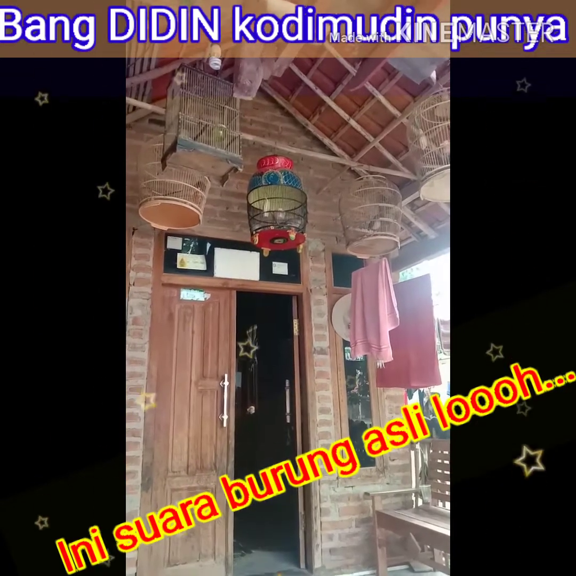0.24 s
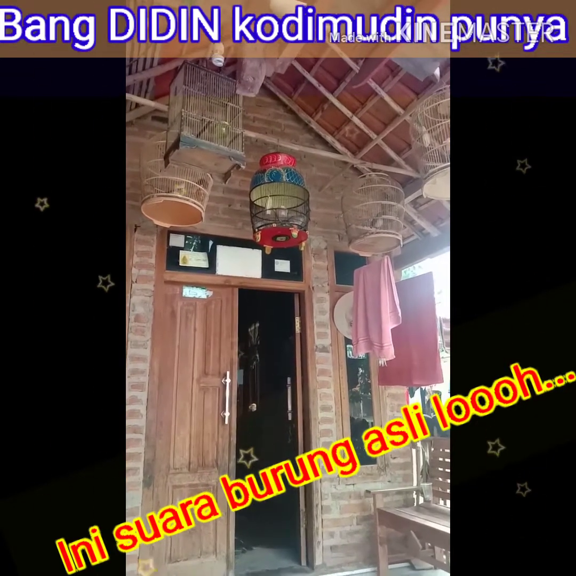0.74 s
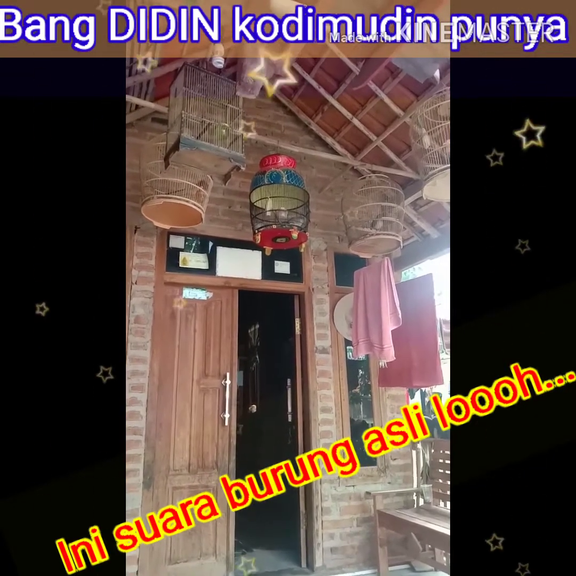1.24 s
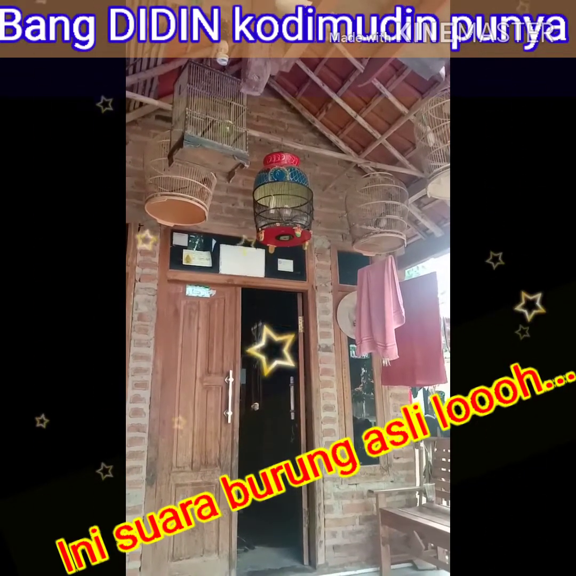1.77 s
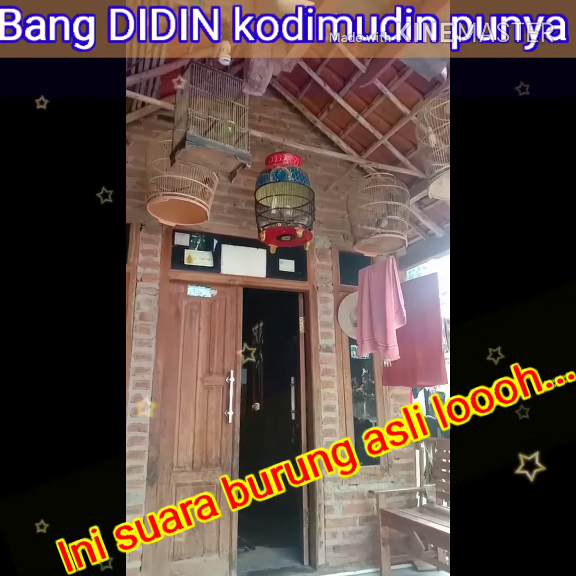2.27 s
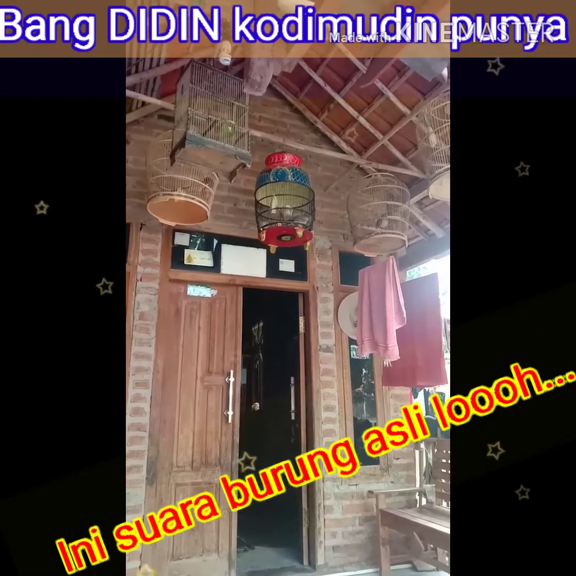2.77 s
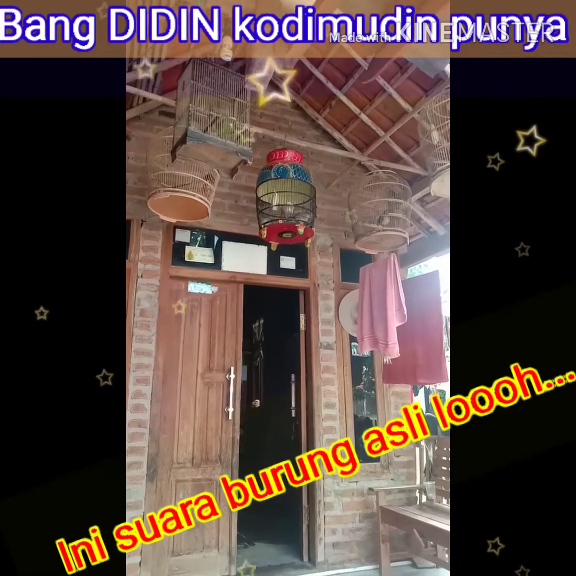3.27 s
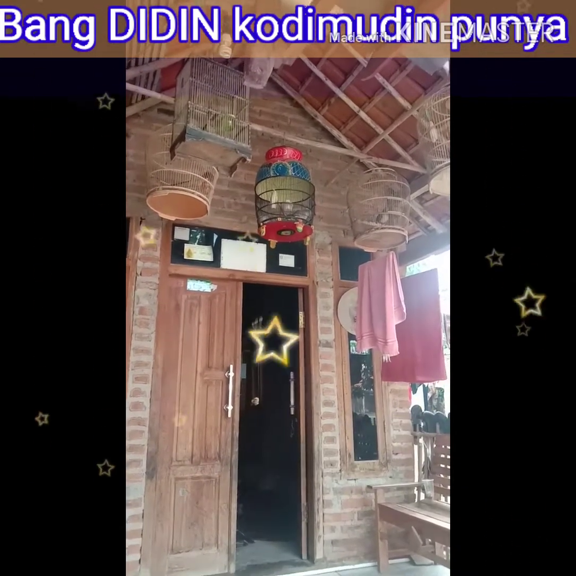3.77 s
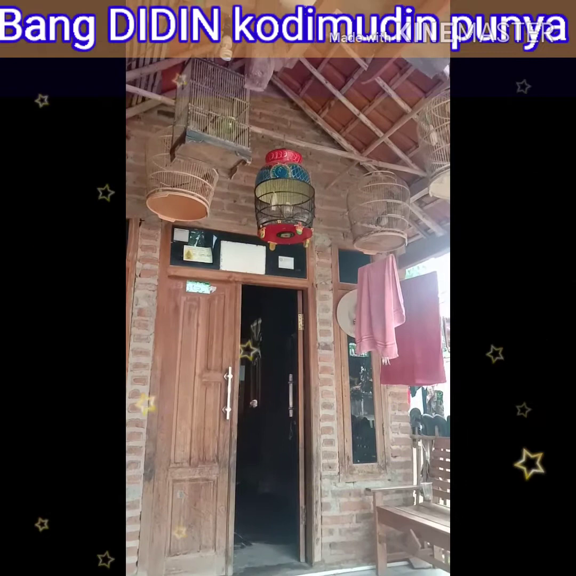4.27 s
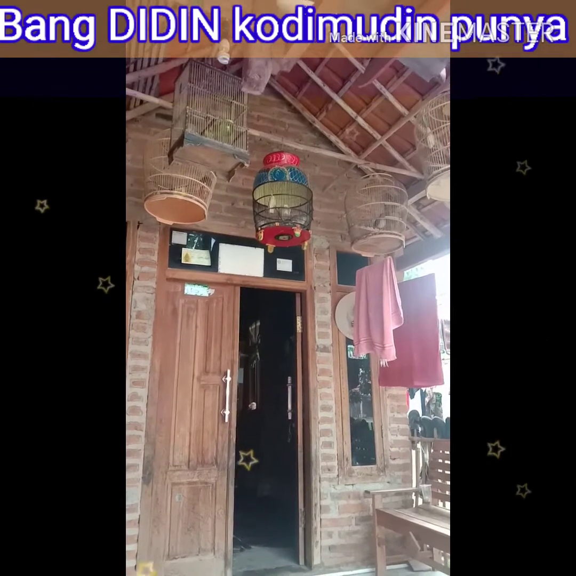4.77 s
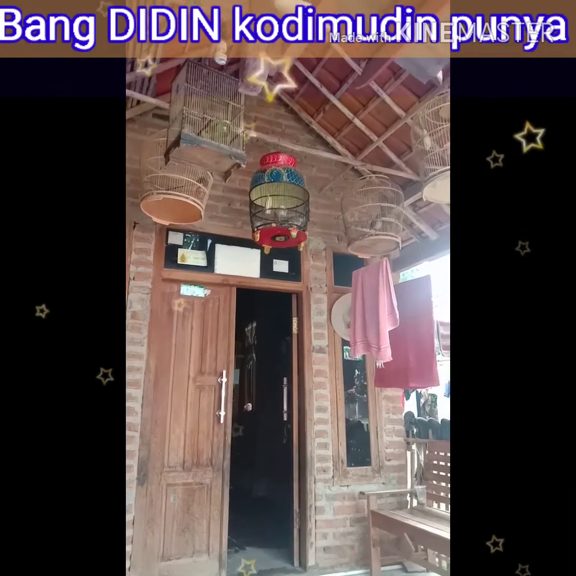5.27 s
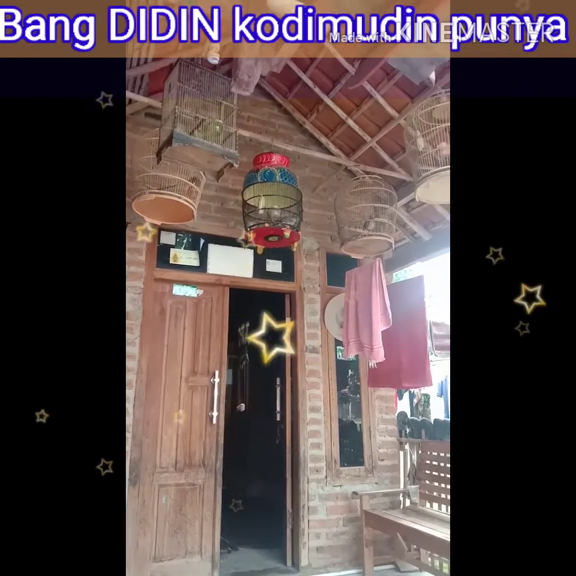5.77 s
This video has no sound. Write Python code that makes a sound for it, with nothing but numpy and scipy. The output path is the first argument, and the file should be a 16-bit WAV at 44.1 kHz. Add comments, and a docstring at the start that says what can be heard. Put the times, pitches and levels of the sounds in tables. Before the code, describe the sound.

A caged dove close by sings a quick six-note mellow coo three times on a brick porch, another dove answering softly, over low rumble.

```python
"""Brick porch: a caged dove coos a motif of six quick, almost pure notes, blurred by the near walls.
The motif comes three times, the first already under way. Each note is a sine swooping up and sagging.
A second dove answers softely from further off with a run of upward-breaking notes and echoes.
Small far birds chirp and call (gliding sines or noise bands); faint dry swishes and a soft knock pass.
Under it all: low rumble, faint hum, distant noise, open-air hiss and a speckle of faint random pips."""
import sys
import numpy as np
from scipy import signal
from scipy.fft import rfft, irfft, next_fast_len
from scipy.io import wavfile

SR = 44100
rng = np.random.default_rng(int(sys.argv[2]) if len(sys.argv) > 2 else 0)


def int16_out(signal):
    """Quantize to a 16-bit WAV file."""
    q = np.round(np.clip(np.atleast_2d(signal).T, -1, 1) * 32767)
    wavfile.write(sys.argv[1], SR, q.astype(np.int16))


N = 265909
TIME_S = np.arange(N) / SR

# Near dove, notes of one motif: start_s in phrase, length_s, swoop_s (time constant),
# top_hz, end_hz (both before sag), level_db
MOTIF = [(0, 0.11, 0.005, 1254, 1227, -13), (0.12, 0.027, 0.0016, 1234, 1130, -12.5),
         (0.1593, 0.033, .0029, 1218, 1132, -13.5), (0.219, .036, .0047, 1208, 1040, -13),
         (0.3078, 0.035, 0.0052, 1234, 1151, -12.5), (0.407, 0.14, 0.0096, 1257, 1040, -13.5)]
# Near dove, each singing of the motif: start_s, time_stretch, level_db
PHRASES = [(-.1805, .998, .7), (2.4145, 1.002, 1.0), (5.1035, 1.013, .7)]
# Faint multiples of the coo's pitch: multiple, level_db
PITCH_MULTIPLES = [(2, -57), (3, -67.5), (4, -70.5), (5, -55.5), (6, -69.5), (7, -72.5)]
# Near dove, pitch and envelope of a note
ONSET_HZ, SAG_HZ_PER_S, DROP_POWER, ATTACK_S, RELEASE_POWER = 600, 261, 5, .0025, 7.6
# Near dove, throat resonance; silent lead-in so the first phrase can start before time 0
THROAT_HZ, THROAT_HALF_WIDTH_HZ, LEAD_S = 1296, 85, .2
# Reflections from wall, roof and floor: delay_ms, level_db
WALLS = [(9.94, -2.4), (19.6, -7.4), (35.3, -7.3), (44.0, -17.1), (58.47, -16.9), (83.8, -25.9),
         (99.0, -28.8)]
# Faint echoes from the houses across the yard: delay_ms, level_db
YARD_ECHOES = [(205, -46), (290, -46)]

# Rumble spectrum: frequency_hz, density_db (relative, per Hz)
RUMBLE_SPECTRUM = [(15, -52), (25, -22.5), (43, -25), (62, -12), (75, 1.5), (134, 1), (157, 2.5),
                   (198, -13), (258, -18), (302, -10.5), (329, -15), (450, -29), (580, -57.5), (990, -120)]
# Rumble level: time_s, level_db
RUMBLE_LEVEL = [(0, -53.5), (.4, -57.5), (.47, -60.5), (.54, -56), (1.0, -57), (1.79, -54.5), (1.87, -49),
                (2.03, -54.5), (2.4, -54), (2.9, -50.5), (2.98, -55.5), (3.11, -50.5), (3.35, -55.5),
                (3.6, -57.5), (4.03, -54), (4.3, -54.5), (5.72, -53), (5.86, -60)]
# Hum partials: frequency_hz, level_db (rms, before waver)
HUM = [(118.4, -64), (218.2, -75), (238.9, -76.5), (297.7, -73.5), (596, -88.5)]
# Open-air spectrum: frequency_hz, density_db (relative, per Hz)
AIR_SPECTRUM = [(260, -43.5), (450, -8), (614, -12), (789, -13), (1150, -14), (1490, -18), (2000, -17.5),
                (2850, -15), (4440, -17.5), (6000, -19.5), (6610, -23.5), (7440, -18.5), (8370, -26.5),
                (12500, -29.5), (15300, -25.5)]
AIR_DB = -73
# Distant outdoor noise bands: centre_hz, width_hz, level_db
DISTANT_BANDS = [(600, 130, -84), (800, 200, -79.5), (1146, 380, -74.5), (1660, 220, -83.5),
                 (2070, 430, -85.5)]
# Common level of those bands: time_s, level_db
DISTANT_LEVEL = [(0, -1), (.9, -8), (1.5, -0.5), (2.0, 2), (2.3, 0), (3.2, 4.5), (3.55, -1.5), (4.3, -2.5),
                 (4.65, 1), (5.0, -3.5), (5.7, -3), (6.0, 2)]

# Rough falling chirps of one small bird: start_s, start_hz, level_db
CHIRPS = [(0.485, 4690, -74.5), (.545, 3700, -80), (1.512, 4510, -78.5), (1.55, 3880, -81),
          (2.045, 4900, -80), (2.075, 4100, -80.5), (2.772, 4140, -60), (4.145, 4680, -75),
          (4.708, 5210, -74), (5.69, 5150, -79.5)]
CHIRP_S, CHIRP_FALL, CHIRP_ROUGHNESS = .062, .13, .19  # fall: fraction of start pitch
# Short and longer far calls, among them a soft coo near 3.04 s:
# start_s, length_s, pitch_hz, level_db, roughness (0-1)
FAR_CALLS = [(0.554, 0.14, 724, -75.5, 0), (.55, 0.053, 3130, -80, 0.06), (.62, 0.033, 6200, -80, 0.02),
             (0.982, 0.082, 3090, -79, 0.1), (1.0, 0.074, 3800, -83, 0.08), (1.219, 0.21, 718, -79.5, .06),
             (1.583, 0.047, 6850, -78, 0.02), (1.671, 0.088, 2240, -77.5, 0.34),
             (1.726, 0.27, 2545, -72, 0.22), (1.767, 0.16, 3150, -74.5, 0.46),
             (2.256, 0.12, 3800, -79, 0.12), (2.28, 0.12, 3170, -75.5, 0.08), (2.99, 0.25, 799, -69, 0.2),
             (3.014, 0.16, 3530, -69, 0.13), (3.045, 0.041, 1176, -47.5, 0.03),
             (3.042, 0.066, 2320, -68, 0.03), (3.207, 0.13, 3620, -72, 0.11),
             (3.222, 0.13, 637, -72.5, 0.33), (3.521, 0.099, 1155, -70, 0.09), (3.39, .08, 2020, -78, .06),
             (3.605, 0.049, 2970, -79, 0.01), (3.67, 0.082, 3080, -78, 0), (4.005, 0.17, 2607, -68.5, 0.04),
             (4.415, .065, 1220, -73, .04), (4.476, 0.18, 1648, -74.5, 0.1),
             (5.878, 0.058, 5990, -79, 0.04), (5.88, 0.047, 3040, -79.5, 0.1),
             (5.868, 0.11, 878, -71, 0.12), (5.93, 0.053, 7200, -84, .05),
             (5.988, 0.022, 2590, -75.5, 0.12)]
FAR_CALL_FALL, GLIDE_ARCH = .025, .02  # fractions of start pitch; the arch serves all glides

# Far dove, notes: start_s, length_s, break_s (time of upward break), top_hz, end_hz, level_db
FAR_COOS = [(1.025, 0.034, 0.0032, 1262, 1220, -54.5), (1.055, 0.062, 0.0091, 999, 1034, -46),
            (1.095, 0.049, 0.0021, 1254, 1219, -31.5), (1.138, 0.0695, 0, 1212, 1182, -38),
            (1.213, 0.034, .004, 1136, 1100, -43), (1.272, 0.04, 0.017, 1140, 990, -51),
            (1.329, 0.033, 0.00092, 1068, 1030, -47), (1.398, 0.036, 0.01, 1130, 1030, -45),
            (1.477, 0.035, 0.012, 1201, 950, -42.5), (1.556, 0.04, .011, 1233, 970, -43.5),
            (1.656, 0.052, 0.014, 1216, 1077, -43), (1.794, 0.096, 0.017, 1175, 1094, -44),
            (1.884, .034, 0, 1190, 1110, -50)]
# Far dove, echoes from porch and houses: delay_ms, level_db
FAR_ECHOES = [(10, -12.5), (21, -13), (36, -14.5), (62, -17), (88, -21.5), (205, -24), (290, -26.5)]
# Far dove, pitch and envelope of a note
FAR_ONSET_HZ, FAR_BREAK_WIDTH_S, FAR_DROP_POWER = 950, .0056, 3.5
FAR_ATTACK_S, FAR_RELEASE_POWER = .0089, 4.85

# Hoarse catches in the throat: start_s in phrase, length_s, start_hz, end_hz, level_db
CATCHES = [(-.036, .034, 1271, 1184, -35), (-.017, 0.023, 883, 1008, -33), (.005, .024, 1057, 1000, -28)]
# Resonances of their rasp: centre_hz, width_hz, level_db
CATCH_MODES = [(868, 160, -4), (1200, 310, 4), (1510, 120, -6)]
# Band of the catches: low_hz, high_hz
CATCH_BAND_HZ = (740, 1600)
CATCH_ROUGHNESS, CATCH_RASP_DB, CATCH_WALLS_DB = .041, -13, -10

# Dry swishes and one soft knock at 3.11 s: peak_s, rise_s, decay_s, resonance_hz at peak,
# glide_hz_per_s, width_hz, level_db, hiss_db (relative to resonance)
STROKES = [(2.95, .012, .03, 7700, -2000, 600, -63, -21), (2.972, 0.026, 0.071, 5866, -2000, 1300, -57, 0),
           (3.08, 0.058, .06, 4500, -6000, 1400, -69, -14),
           (3.114, .004, 0.044, 1030, -0.5, 400, -54.5, -30),
           (3.142, 0.014, 0.03, 1750, -2000, 495, -60.5, -14),
           (3.248, 0.014, .06, 7500, -3000, 704, -70, 1),
           (4.535, 0.025, .05, 4400, 6002, 1200, -66.5, -0.5),
           (4.625, 0.055, 0.063, 5700, -3000, 1100, -59, -1),
           (4.63, 0.065, .05, 3700, -3000, 1520, -72, -18),
           (4.972, 0.026, .06, 4300, 3997.5, 1400, -63.5, -10),
           (5.045, 0.041, 0.035, 5450, 3999, 799, -58.5, -1), (5.1, 0.018, .02, 5600, -2, 600, -65, -10.5)]
# Hiss spectrum of the strokes: frequency_hz, density_db (relative, per Hz)
STROKE_SPECTRUM = [(1200, -24), (1700, -12.5), (2400, -19), (3400, -4), (4600, -4.5), (6100, 3.5),
                   (6700, -9), (7700, -3.5), (9500, -22.5), (13000, -35)]

CUTOFF_HZ = 15500


def from_db(db):
    """Decibels to gain."""
    return 10 ** (np.asarray(db) / 20)


def rms_one(x):
    """Scale to rms 1."""
    return x / np.sqrt(np.mean(x ** 2) + 1e-20)


def drift(rate_hz):
    """Slow random curve, rms 1: noise through a double one-pole low-pass, first second dropped."""
    pole = np.exp(-2 * np.pi * rate_hz / SR)
    noise = rng.standard_normal(N + SR)
    return rms_one(signal.lfilter([1], [1, -2 * pole, pole * pole], noise)[SR:])


def band_noise(hz, width_hz):
    """Noise in one resonance, rms 1."""
    edges_hz = np.clip([hz - width_hz / 2, hz + width_hz / 2], 20, .45 * SR)
    band = signal.butter(2, edges_hz, "band", fs=SR, output="sos")
    return rms_one(signal.sosfilt(band, rng.standard_normal(N)))


def gliding_band(hz, width_hz):
    """Noise in a resonance that follows a pitch curve, rms 1: two low-passed noises on a carrier."""
    low_pass = signal.butter(3, np.clip(width_hz / 2, 20, 4000), fs=SR, output="sos")
    noise = rng.standard_normal((2, len(hz) + 2000))
    in_phase, quadrature = signal.sosfilt(low_pass, noise)[:, 2000:]  # filter run in
    phase = 2 * np.pi * np.cumsum(hz) / SR
    return rms_one(in_phase * np.cos(phase) + quadrature * np.sin(phase))


def coloured_noise(spectrum):
    """Noise with a given spectrum, rms 1; it falls away below the lowest listed frequency."""
    hz, density_db = np.transpose(spectrum)
    size = next_fast_len(N)
    bins_hz = np.maximum(np.fft.rfftfreq(size, 1 / SR), 1)
    gain = from_db(np.interp(np.log(bins_hz), np.log(hz), density_db))
    gain *= np.minimum(1, bins_hz / hz[0]) ** 2
    return rms_one(irfft(rfft(rng.standard_normal(size)) * gain, size)[:N])


def echoes(x, paths):
    """One delayed copy for each reflecting surface."""
    return sum(from_db(level_db) * np.interp(TIME_S - delay_ms / 1000, TIME_S, x, left=0)
               for delay_ms, level_db in paths)


def diffuse(x, t60_s):
    """Countless dying reflections: convolution with a decaying noise tail of unit energy."""
    age_s = TIME_S[:SR]
    tail = rng.standard_normal(SR) * from_db(-60 * age_s / t60_s) * (1 - np.exp(-age_s / .01))
    return signal.fftconvolve(x, tail / np.sqrt(np.sum(tail ** 2)))[:N]


def near_notes():
    """The motif laid out for every phrase, shifted by the lead-in."""
    return [(LEAD_S + phrase_s + stretch * s, stretch * length_s, swoop_s, top_hz, end_hz,
             phrase_db + note_db)
            for phrase_s, stretch, phrase_db in PHRASES
            for s, length_s, swoop_s, top_hz, end_hz, note_db in MOTIF]


def coo(notes):
    """Each note swoops up, sags and drops, loudest near the throat resonance; yields mask, level, phase."""
    for s, length_s, swoop_s, top_hz, end_hz, level_db in notes:
        on = (TIME_S > s) & (TIME_S < s + length_s)
        age_s = TIME_S[on] - s
        part = age_s / length_s
        swoop = (top_hz - ONSET_HZ) * np.exp(-age_s / swoop_s)
        drop = (top_hz - end_hz) * part ** DROP_POWER
        hz = top_hz - swoop - SAG_HZ_PER_S * age_s - drop
        breath = (1 - np.exp(-age_s / ATTACK_S)) ** 2 * (1 - part ** RELEASE_POWER)
        throat = 1 / (1 + ((hz - THROAT_HZ) / THROAT_HALF_WIDTH_HZ) ** 2)
        yield on, from_db(level_db) * breath * throat, 2 * np.pi * np.cumsum(hz) / SR


def near_dove(multiples_db=-3.0, growth_db_per_s=15.0, flicker_db=6.5, lowest_hz=790):
    """Almost pure sine, no lows from a small throat; faint pitch multiples, stronger on the loud last note."""
    out = np.zeros(N)
    flicker = [from_db(flicker_db * drift(25)) for _ in PITCH_MULTIPLES]
    starts_s = LEAD_S + np.transpose(PHRASES)[0]
    phrase_start_s = starts_s[np.searchsorted(starts_s, TIME_S, "right") - 1]
    growth = from_db(multiples_db + growth_db_per_s * (TIME_S - phrase_start_s))
    for on, level, phase in coo(near_notes()):
        multiples = sum(from_db(db) * waver[on] * np.sin(multiple * phase)
                        for (multiple, db), waver in zip(PITCH_MULTIPLES, flicker))
        fullness = level / level.max()  # multiples show at the height of a note
        out[on] += level * (np.sin(phase) + growth[on] * fullness * multiples)
    return signal.sosfilt(signal.butter(8, lowest_hz, "high", fs=SR, output="sos"), out)


def porch(x):
    """Near surfaces return the sound; on a gliding note the echoes beat against it."""
    return x + echoes(x, WALLS)


def background(lumps_db=2.5, hum_waver_db=3.5, hum_wander=.005):
    """A lumpy low rumble, a wavering hum of sines and the thin, steady hiss of the open air."""
    rumble_db = np.interp(TIME_S, *np.transpose(RUMBLE_LEVEL)) + lumps_db * drift(25)
    rumble = coloured_noise(RUMBLE_SPECTRUM) * from_db(rumble_db)
    warped_s = np.cumsum(1 + hum_wander * drift(1)) / SR  # shared pitch wander
    hum = sum(np.sqrt(2) * from_db(db + hum_waver_db * drift(1.7)) * np.sin(2 * np.pi * hz * warped_s)
              for hz, db in HUM)
    return rumble + hum + from_db(AIR_DB) * coloured_noise(AIR_SPECTRUM)


def distant_noise(waver_db=3.5):
    """Faint outdoor noise swells and sinks, and each band also comes and goes on its own."""
    bands = sum(from_db(db + waver_db * drift(6)) * band_noise(hz, width_hz)
                for hz, width_hz, db in DISTANT_BANDS)
    return bands * from_db(np.interp(TIME_S, *np.transpose(DISTANT_LEVEL)))


def speckle(count=70, low_hz=1500, high_hz=4200, level_db=-82, spread_db=2):
    """Faint random pips speckling the background: start_s, length_s, pitch_hz, fall, level_db, roughness."""
    when, size, pitch, slide, loud = rng.random((count, 5)).T
    hz = low_hz * (high_hz / low_hz) ** pitch
    length_s = .025 + .05 * size
    pip_db = level_db + spread_db * (2 * loud - 1)
    return list(zip(when * N / SR, length_s, hz, .05 * slide, pip_db, .08 * size))


def glides(calls, blur, hoarse_at):
    """Short pitch glides; the rougher one is, the more of it is smeared into a noise band at its pitch."""
    out = np.zeros(N)
    for s, length_s, start_hz, fall, level_db, rough in calls:
        on = (TIME_S > s) & (TIME_S < s + length_s)
        part = (TIME_S[on] - s) / length_s
        hz = start_hz * (1 - fall * part + GLIDE_ARCH * np.sin(np.pi * part))
        hoarse = np.clip(rough / hoarse_at, 0, 1)
        tone = np.sqrt(1 - hoarse) * np.sin(2 * np.pi * np.cumsum(hz) / SR)
        noise = np.sqrt(hoarse / 2) * gliding_band(hz, blur * rough * start_hz)
        out[on] += from_db(level_db) * np.sqrt(np.sin(np.pi * part)) * (tone + noise)
    return out


def far_calls_and_speckle(blur=0.8, hoarse_at=0.12, direct_db=8.5, wet_db=0.0, chirp_wet_db=-5.5,
                          t60_s=0.77):
    """The chirping bird is nearer and drier; far calls and speckle ring on between the houses."""
    chirp_rows = [(s, CHIRP_S, hz, CHIRP_FALL, db, CHIRP_ROUGHNESS) for s, hz, db in CHIRPS]
    call_rows = [(s, length_s, hz, FAR_CALL_FALL, db, rough)
                 for s, length_s, hz, db, rough in FAR_CALLS]
    chirps = glides(chirp_rows, blur, hoarse_at)
    others = glides(call_rows + speckle(), blur, hoarse_at)
    ringing = diffuse(from_db(chirp_wet_db) * chirps + from_db(wet_db) * others, t60_s)
    return from_db(direct_db) * (chirps + others) + ringing


def far_dove(direct_db=2.5, echo_db=0.0, wet_db=-4.5, t60_s=0.59, rough=.005, lowest_hz=880):
    """Each note starts low, breaks upwards and drops; distance roughens it and the houses scatter it."""
    out, tremble = np.zeros(N), drift(70)
    for s, length_s, break_s, top_hz, end_hz, level_db in FAR_COOS:
        on = (TIME_S > s) & (TIME_S < s + length_s)
        age_s = TIME_S[on] - s
        part = age_s / length_s
        low = (1 - np.tanh((age_s - break_s) / FAR_BREAK_WIDTH_S)) / 2
        drop = (top_hz - end_hz) * part ** FAR_DROP_POWER
        hz = (top_hz - (top_hz - FAR_ONSET_HZ) * low - drop) * (1 + rough * tremble[on])
        breath = (1 - np.exp(-age_s / FAR_ATTACK_S)) * (1 - part ** FAR_RELEASE_POWER)
        out[on] += from_db(level_db) * breath * np.sin(2 * np.pi * np.cumsum(hz) / SR)
    out = signal.sosfilt(signal.butter(8, lowest_hz, "high", fs=SR, output="sos"), out)
    scattered = from_db(echo_db) * echoes(out, FAR_ECHOES) + from_db(wet_db) * diffuse(out, t60_s)
    return from_db(direct_db) * out + scattered


def catches():
    """Before the voice locks on, its pitch glides and trembles, with a rasp in the throat resonances."""
    rasp = rms_one(sum(from_db(db) * band_noise(hz, width_hz) for hz, width_hz, db in CATCH_MODES))
    out, tremble = np.zeros(N), drift(130)
    for phrase_s, _, _ in PHRASES:  # those of the first phrase fall before time 0
        for s, length_s, start_hz, end_hz, level_db in CATCHES:
            on = (TIME_S > phrase_s + s) & (TIME_S < phrase_s + s + length_s)
            part = (TIME_S[on] - phrase_s - s) / length_s
            hz = (start_hz + (end_hz - start_hz) * part) * (1 + CATCH_ROUGHNESS * tremble[on])
            voice = np.sin(2 * np.pi * np.cumsum(hz) / SR) + from_db(CATCH_RASP_DB) * rasp[on]
            out[on] += from_db(level_db) * np.sin(np.pi * part) ** 2 * voice
    out = signal.sosfilt(signal.butter(4, CATCH_BAND_HZ, "band", fs=SR, output="sos"), out)
    return out + from_db(CATCH_WALLS_DB) * echoes(out, WALLS)


def swell(peak_s, rise_s, decay_s):
    """A smooth rise to a peak, then an exponential decay."""
    from_peak_s = TIME_S - peak_s
    return np.exp(-(np.minimum(from_peak_s, 0) / rise_s) ** 2 - np.maximum(from_peak_s, 0) / decay_s)


def swishes_and_knock(grain_db=2.4, glide_s=0.17, hiss_power=1.4):
    """Grainy swishes and a soft knock: a gliding noise resonance, with hiss flaring at the height."""
    out, hiss = np.zeros(N), coloured_noise(STROKE_SPECTRUM)
    grain = from_db(grain_db * drift(90))
    for s, rise_s, decay_s, hz, glide_hz_per_s, width_hz, level_db, hiss_db in STROKES:
        force = swell(s, rise_s, decay_s)
        path_hz = hz + glide_hz_per_s * np.clip(TIME_S - s, -glide_s, glide_s)
        stroke = force * gliding_band(path_hz, width_hz)
        flare = from_db(hiss_db) * force ** hiss_power * hiss
        out += from_db(level_db) * grain * (stroke + flare)
    return out


def scene(dove_db=1.04, yard_db=-31.0, yard_t60_s=0.86, tail_waver_db=3.0):
    """The dove under the porch roof, its echoes and faint wavering tail in the yard, and all further off."""
    lead = int(LEAD_S * SR)
    sung = np.pad(porch(near_dove())[lead:], (0, lead))
    dove = from_db(dove_db) * sung + catches()
    yard = echoes(dove, YARD_ECHOES) + from_db(yard_db) * diffuse(dove, yard_t60_s)
    yard = yard * from_db(tail_waver_db * drift(25))
    outdoors = background() + distant_noise() + far_calls_and_speckle() + far_dove()
    return (dove + yard + outdoors + swishes_and_knock())[None]


def record(dry):
    """A 2 ms fade-in and a steep low-pass."""
    fade = np.sin(np.pi / 2 * np.minimum(TIME_S / .002, 1)) ** 2
    return signal.sosfilt(signal.ellip(10, .1, 80, CUTOFF_HZ, fs=SR, output="sos"), fade * dry)


dry = scene()
out = record(dry)
int16_out(out)
```